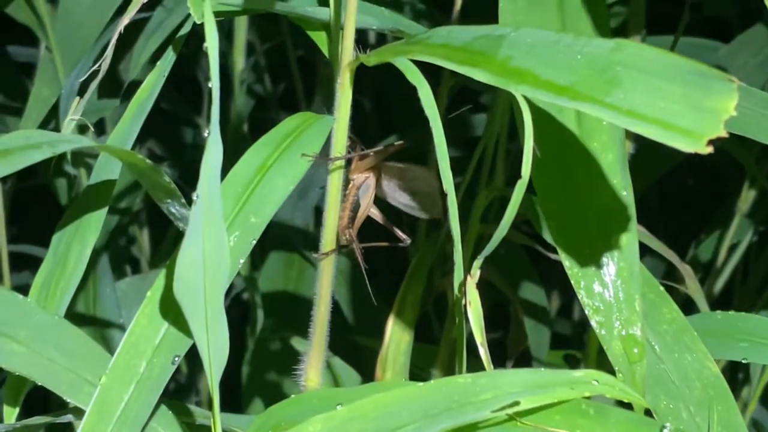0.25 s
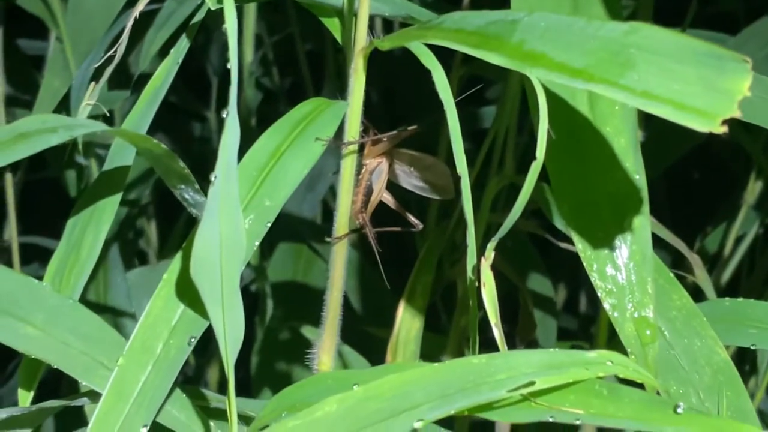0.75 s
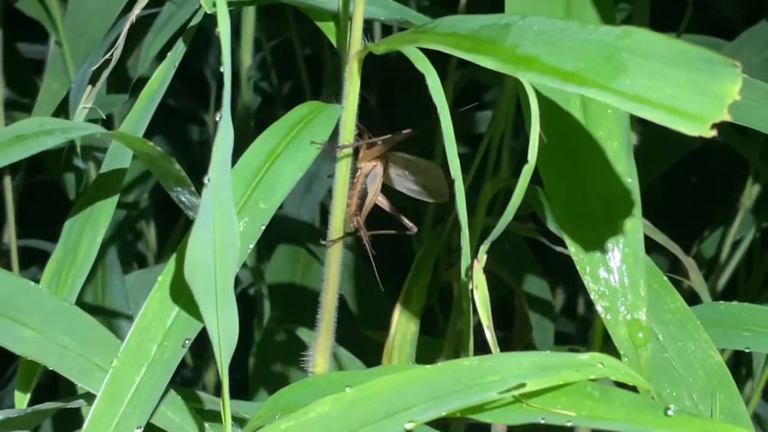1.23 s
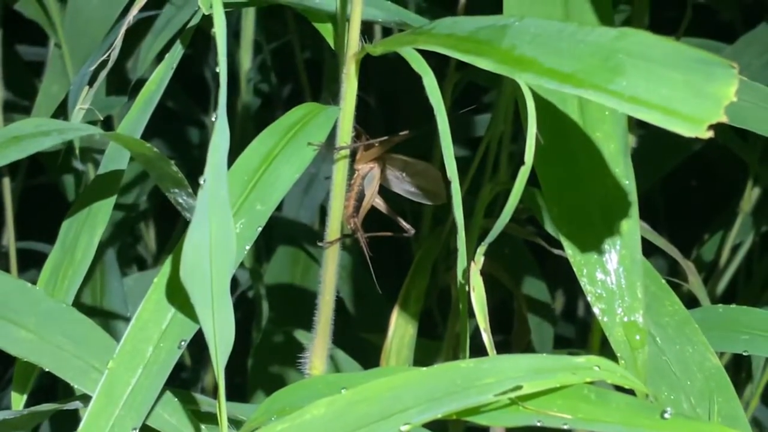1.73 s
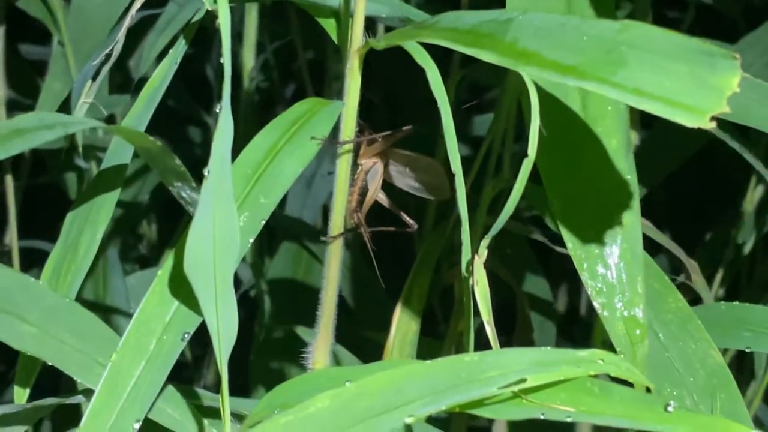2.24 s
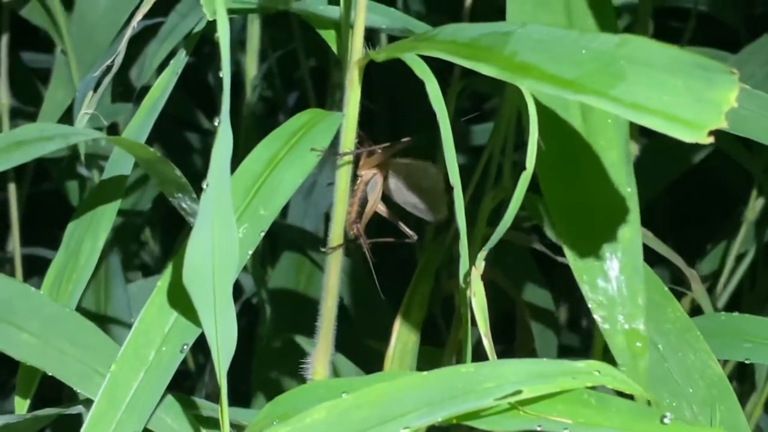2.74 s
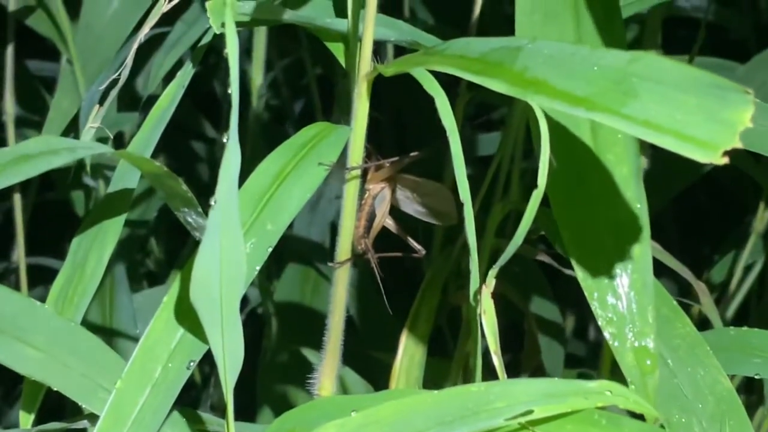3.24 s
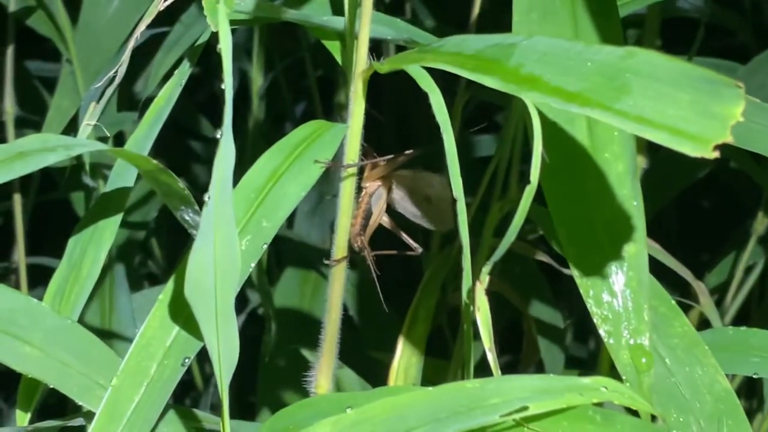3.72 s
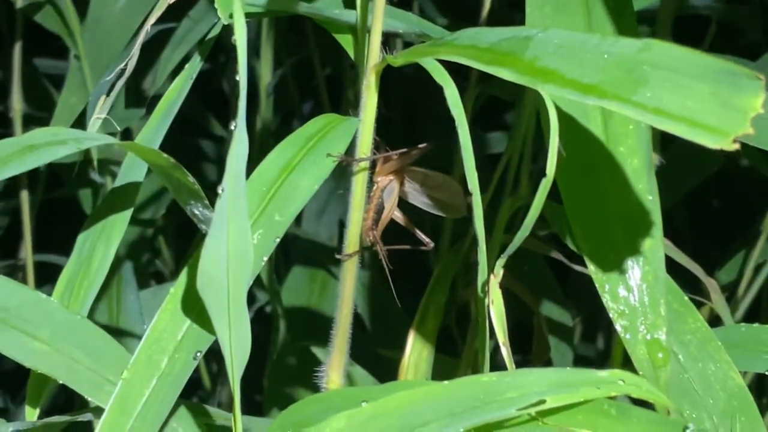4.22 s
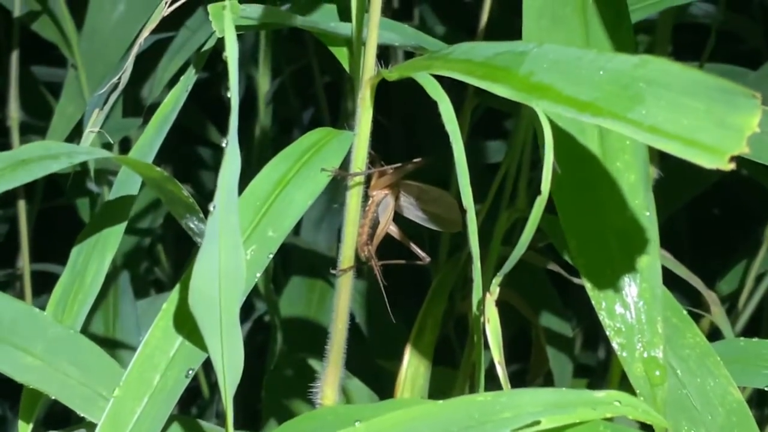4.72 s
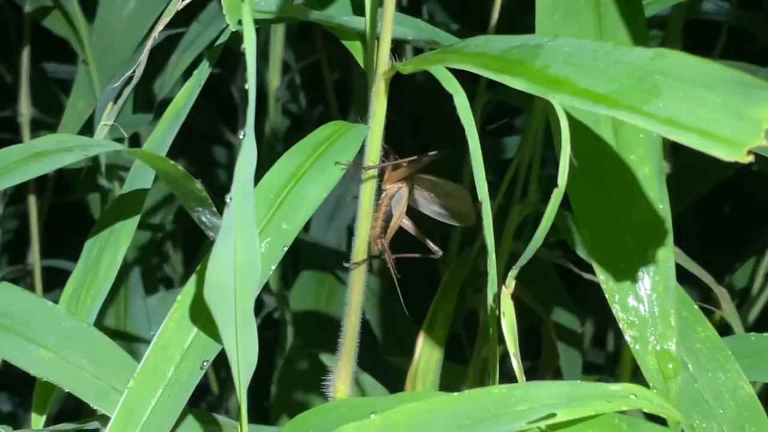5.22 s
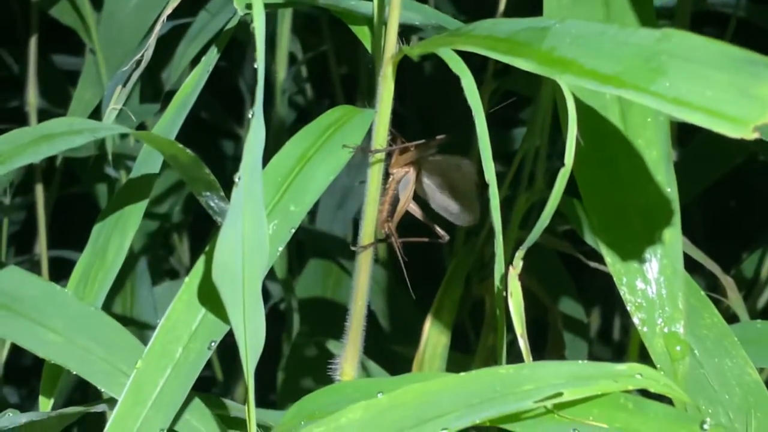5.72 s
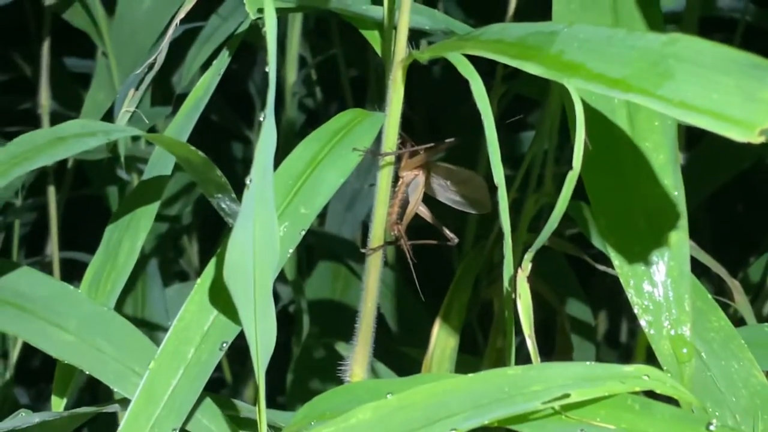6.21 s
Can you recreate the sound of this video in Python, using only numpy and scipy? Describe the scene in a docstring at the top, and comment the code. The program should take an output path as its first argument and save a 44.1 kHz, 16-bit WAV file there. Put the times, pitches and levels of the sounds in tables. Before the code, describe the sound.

A single cricket on a grass stem chirps loudly right at the microphone, outdoors at night. Each chirp is a quick run of four high, ringing pulses with a slight rasp, repeating a little more than once a second, with one longer pause past the middle. Far behind it, other crickets trill and thin buzzes come and go over a low hush, with a few faint bumps and leaf rustles.

```python
"""Close cricket at night

A cricket on a grass stem, right at the microphone, sings chirps of four wing strokes. Each stroke draws
the scraper over the file and rings the wings near 4.7 kHz, with a bright third harmonic. Other insects
trill far off over a low hush, with faint bumps and rustles; gain control ducks under the loud strokes."""
import sys
import numpy as np
from scipy import signal
from scipy.fft import rfft, irfft
from scipy.io import wavfile
from scipy.ndimage import uniform_filter1d, minimum_filter1d

SR = 44100
rng = np.random.default_rng(int(sys.argv[2]) if len(sys.argv) > 2 else 0)


def inscribe(sig):
    """Save sig as 16-bit PCM at rate SR to the path in sys.argv[1].

    A 1-D sig is mono; a 2-D sig holds one channel per row.
    Samples are clipped to [-1, 1] before scaling.
    """
    pcm = np.round(np.clip(np.atleast_2d(sig).T, -1, 1) * 32767)
    wavfile.write(sys.argv[1], SR, pcm.astype(np.int16))


N = 284886
TIME = np.arange(N) / SR

# tone of the night air: f/Hz, relative level/dB
AIR_SPECTRUM = [(20, -28), (35, -13), (55, 2.5), (90, 0.5), (170, -1.5), (300, -7.5), (550, -14),
                (1300, -11.5), (2700, -13), (4500, -14.5), (8000, -41), (13000, -17.5), (16000, -40.5)]
# stereo width of the air: f/Hz, side re mid/dB
AIR_WIDTH = [(40, -13), (150, -13.5), (550, -1), (1200, -1), (2500, -30), (5000, -16), (9000, 31),
             (13000, -12)]
# leaf rustles: t/s, level/dB
LEAF_TOUCHES = [(1.92, -58.5), (4.28, -63), (6.16, -57)]
# soft bumps: t/s, peak level/dB
BUMP_HITS = [(.19, -48), (.888, -41), (2.96, -47), (3.596, -45.5), (3.664, -44)]
# ring of a bump: f/Hz, relative level/dB, t60/s
BUMP_RING = [(183, -5.5, 0.042), (261, -5.5, 0.026), (480, -9.5, 0.018), (830, -14, 0.033)]
# far insects up to 7 kHz and a faint steady high hiss near 10 kHz: f/Hz, width/Hz, level/dB, flicker/dB
NOISE_BANDS = [(6880, 334, -53, 2.5), (7000, 150, -65, 3), (3308, 130, -68, 2.5), (5345, 1300, -67.5, -2.5),
               (9857, 700, -75, -0.5), (2318, 71, -76.5, 3)]
# far callers that repeat evenly: first call t/s, period/s, f/Hz, width/Hz, level/dB
SLOW_CALLERS = [(0.082, 0.285, 2324, 110.8, -74), (0.195, 1.09, 3055, 178.4, -74.5)]
# buzzes of a distant bush cricket: start t/s, end t/s, level/dB
BUZZ_SPANS = [(2.35, 2.7, -62.5), (3.74, 4.07, -58.5), (4.38, 4.9, -58.5), (5.3, 5.605, -61)]
# trills of distant crickets: start t/s, end t/s, f/Hz, level/dB, scattered re direct/dB
FAR_TRILLS = [(0, .47, 5940, -61, -7), (0.952, 1.965, 5790, -59, -0.5), (2.353, 3.32, 5930, -60, -9),
              (3.8, 4.5, 5770, -59.5, 1), (3.85, 4.847, 5195, -67, 5), (4.498, 4.85, 5840, -66, -1),
              (5.174, 6.1, 5940, -60.5, -9), (6.151, 6.46, 5730, -59, 2)]
# the near cricket's chirps: start t/s, stroke period/s, vigour (-1 to 1), flutter (0 to 1),
# number of clean strokes before the flutter sets in
CHIRP_CUES = [(0.042, .0670, -1, .03, 1), (0.998, .0677, -.2, .03, 1), (1.968, .0680, 0, .43, 3),
              (2.743, .0680, .2, .24, 2), (3.520, .0684, .2, .03, 1), (4.833, .0670, -.9, .27, 2),
              (5.553, .0684, 1, .26, 1), (6.281, .0684, .9, .02, 1)]
# the four closing strokes of a chirp: length/s, f/Hz, level/dB, rise per vigour/Hz, gain per vigour/dB
CLOSING_STROKES = [(.053, 4556, -22.5, 8.6, .4), (.055, 4670, -18.5, 48, 1.2), (.057, 4748, -14.5, 15, 1.2),
                   (.061, 4760, -15.4, 1.6, 0.45)]
# shape of the light first stroke: position (0 to 1), relative level/dB, pitch offset/Hz
LIGHT_STROKE = [(0, -16, 50), (.07, -3, 30), (.3, -.3, -10), (.6, 1.2, 5), (.82, .5, 40), (.92, -2, 20),
                (1, -15, -150)]
# shape of the three firm strokes: position (0 to 1), relative level/dB, pitch offset/Hz
FIRM_STROKE = [(0, -17, -40), (.1, -3, -50), (.26, 1.2, -20), (.43, 3.4, -2), (.68, 1.5, 10), (.8, -.9, -4),
               (.92, -5.5, -90), (1, -17.5, -260)]
# higher wing modes that wake when the wings slip: f/Hz, relative level/dB
WING_SLIP_MODES = [(5228, -16), (5582, -25)]
# the wings' upper resonance, which shapes the third harmonic: f/Hz, gain/dB
UPPER_RESONANCE = [(13400, -14), (13620, -10), (13705, -21), (13790, -14), (13850, -8), (13980, .5),
                   (14100, -1.5), (14170, -6), (14260, -9.5), (14340, -12.5)]
# tone of the file's scraping noise: f/Hz, gain/dB
RASP_SPECTRUM = [(2200, -77.5), (3200, -25.5), (3700, -12.5), (4200, -1.5), (4700, 2), (6000, -9.5),
                 (8300, -21.5), (10500, -11), (13000, 4.5), (14200, -1), (15700, -10.5)]
# hard snags of the scraper at the start of some strokes: t/s, relative level/dB
SCRAPER_SNAGS = [(0.175, -27), (2.035, -30), (2.877, -35), (2.948, -26.5), (3.588, -28.5), (3.655, -29),
                 (5.621, -35), (5.688, -38), (6.347, -33.5)]


def undb(db):
    """Decibels to gain."""
    return 10 ** (np.asarray(db) / 20)


def unit(x):
    """Scale to rms 1."""
    return x / np.sqrt(np.mean(np.abs(x) ** 2))


def colour(x, points):
    """EQ by a curve of (f/Hz, gain/dB) points."""
    hz, db = np.transpose(points)
    bins = np.maximum(np.fft.rfftfreq(N, 1 / SR), 1)
    return irfft(rfft(x) * undb(np.interp(np.log(bins), np.log(hz), db)), N)


def band(hz, width_hz):
    """A band of noise around one pitch."""
    detune = (np.fft.rfftfreq(N, 1 / SR) - hz) / width_hz
    return unit(irfft(rfft(rng.standard_normal(N)) / (1 + detune ** 2) ** 2, N))


def walk(rate_hz):
    """Smooth random modulation with a spread near 1."""
    hold = int(SR / rate_hz)
    steps = np.repeat(rng.standard_normal(N // hold + 1), hold)
    return 1.7 * uniform_filter1d(uniform_filter1d(steps, hold), hold)[:N]


def wobble(n, size):
    """Random modulation for one stroke, smoothed over `size` samples."""
    return unit(np.convolve(rng.standard_normal(SR // 8), np.hanning(size), "same"))[:n]


def ports(tone, lead_rad):
    """Place a complex tone in stereo by its phase lead at the left microphone port."""
    return np.sqrt(2) * np.real(tone * np.exp(.5j * lead_rad * np.array([[1], [-1]])))


def spread(mid, side):
    """Mid and side to left and right."""
    return mid + side * np.array([[1], [-1]])


def add(out, start_s, x):
    """Mix x into out from a given time."""
    i = max(int(start_s * SR), 0)
    n = max(min(x.shape[-1], N - i), 0)
    out[..., i:i + n] += x[..., :n]


def night_air(db=-61, waver_db=.51):
    """The bed: a low hush that wavers slightly."""
    mid, side = (unit(colour(rng.standard_normal(N), AIR_SPECTRUM)) for _ in range(2))
    return undb(db + waver_db * walk(5.2)) * spread(mid, colour(side, AIR_WIDTH))


def rustles(width_s=.008, hz=1500, width_hz=1600):
    """A leaf brushes its neighbour now and then: a soft puff of noise."""
    touch = sum(undb(db) * np.exp(-.5 * ((TIME - s) / width_s) ** 2) for s, db in LEAF_TOUCHES)
    return touch * band(hz, width_hz)


def bumps():
    """Faint dull knocks close to the microphone."""
    out, t = np.zeros(N), np.arange(SR // 10) / SR
    ring = sum(undb(db - 60 * t / t60) * np.sin(2 * np.pi * hz * t) for hz, db, t60 in BUMP_RING)
    for s, db in BUMP_HITS:
        add(out, s, undb(db) * ring / np.abs(ring).max())
    return out


def far_insects_and_hiss():
    """Far insects blurred into noise bands, a faint steady high hiss near 10 kHz, two slow callers."""
    out = np.zeros((2, N))
    for hz, width_hz, db, flicker_db in NOISE_BANDS:
        layer = ports(unit(signal.hilbert(band(hz, width_hz))), -.81)
        layer += spread(0, .18 * band(hz, width_hz))
        out += undb(db + flicker_db * (walk(40) + walk(5.023)) / 2) * layer
    for first_s, period_s, hz, width_hz, db in SLOW_CALLERS:
        calls = np.cos(np.pi * (TIME - first_s) / period_s) ** 4
        out += undb(db) * unit(calls) * spread(band(hz, width_hz), .083 * band(hz, width_hz))
    return out


def bush_cricket(hz=10130, width_hz=450):
    """Thin buzzes that swell and fade, far off to one side."""
    swell = sum(undb(db) * np.sin(np.pi * np.clip((TIME - start) / (end - start), 0, 1))
                for start, end, db in BUZZ_SPANS)
    return swell * ports(unit(signal.hilbert(band(hz, width_hz))), 2.06)


def far_trills(stroke_hz=37.64, overtone_db=-24, fade_s=.024, blur_hz=240):
    """Distant crickets trill in turns; scattering blurs the strokes of the furthest."""
    out, waver_db, drift = np.zeros((2, N)), walk(8), walk(30)
    # a noise band shifted down to 0 Hz, ready to ride on each trill's pitch
    blur = unit(signal.hilbert(band(SR / 4, blur_hz))) * np.exp(-.5j * np.pi * np.arange(N))
    for start, end, hz, db, scattered_db in FAR_TRILLS:
        span = (TIME >= start) & (TIME < end)
        t = TIME[span] - start
        gate = np.clip(np.minimum(t, t[-1] - t) / fade_s, 0, 1)
        cycle = 2 * np.pi * stroke_hz * t
        phase = 2 * np.pi * np.cumsum(hz + 35 * np.sin(cycle) + 10 * drift[span]) / SR
        direct = unit(1 - .8 * np.cos(cycle)) * np.exp(1j * phase)
        scattered = undb(scattered_db) * blur[span] * np.exp(2j * np.pi * hz * t)
        overtone = undb(overtone_db) * ports(direct * np.exp(1j * phase), 0)
        voice = ports(unit(direct + scattered), -1.3) + overtone
        add(out, start, undb(db + waver_db[span]) * gate * voice)
    return out


def foliage(x, width=.37, early_t60_s=.13, early_db=-24.5, late_t60_s=.6, late_db=-37):
    """Near leaves scatter a quick echo, the plants further off a faint tail."""
    t = np.arange(SR // 2) / SR
    response = 0
    for t60_s, db in ((early_t60_s, early_db), (late_t60_s, late_db)):
        mid, side = rng.standard_normal((2, len(t))) * undb(-60 * t / t60_s) * (t > .003)
        response = response + undb(db) * spread(mid, width * side) / np.sqrt(np.sum(mid ** 2))
    dull = signal.sosfilt(signal.butter(1, 8000, fs=SR, output="sos"), x)
    return signal.fftconvolve(dull, response, axes=1)[:, :N]


def wing_opening(hz=13500, swing_hz=1100, warble_hz=210, db=-29):
    """The wings flick open: the scraper skids back over the file with a tiny warbling squeak."""
    t = np.arange(int(.012 * SR)) / SR
    warble = np.sin(2 * np.pi * (warble_hz * t + rng.random()))
    pitch = hz + swing_hz * warble + 300 * wobble(len(t), size=30)
    return undb(db) * np.hanning(len(t)) * ports(np.exp(2j * np.pi * np.cumsum(pitch) / SR), 0)


def scraper_tick(hz=3750, t60_s=.0058, db=-42):
    """The scraper lands on the file at the head of a chirp and knocks a low wing mode."""
    t = np.arange(SR // 20) / SR
    attack = 1 - np.exp(-t * hz / 2)
    return undb(db - 60 * t / t60_s) * attack * ports(np.exp(2j * np.pi * hz * t), .68)


def catch(rise_s=.0027):
    """Envelope of the short rasp as the first teeth strike, before the wings ring steadily."""
    t = np.arange(SR // 20) / SR
    return t / rise_s * np.exp(1 - t / rise_s)


def file_rasp(envelope, grit_db=3, grit_hz=900):
    """Scraping noise of the file; uneven teeth make it gritty."""
    gritty = envelope * unit(undb(grit_db * walk(grit_hz)))
    mid, side = (colour(gritty * rng.standard_normal(N), RASP_SPECTRUM) for _ in range(2))
    return 2 * spread(mid, .35 * side)


def wing_stroke(shape, length_s, hz, flutter, flutter_hz,
                second_db=-24, third_db=-2.5, easing_db=-3, jitter_hz=6, shimmer=.08):
    """One closing stroke: the file's teeth drive the wings, and the pitch sags as the wings slow down."""
    n = int(length_s * SR)
    t, position = np.arange(n) / SR, np.linspace(0, 1, n)
    knots, db, offset_hz = np.transpose(shape)
    slow, grain, stray = wobble(n, size=400), wobble(n, size=80), wobble(n, size=600)
    pitch = hz + np.interp(position, knots, offset_hz)
    phase = 2 * np.pi * np.cumsum(pitch + jitter_hz * grain) / SR
    swell = undb(np.interp(position, knots, db)) * signal.windows.tukey(n, .05)
    # in mid-stroke the two wings can fall out of step and beat against each other
    slip = flutter * np.sin(np.pi * position) ** 2
    beat_cycles = np.cumsum(flutter_hz * (1 + .12 * stray)) / SR + rng.random()
    beat = slip * np.exp(2j * np.pi * beat_cycles)
    roughness = (.1 * slip + .011) * grain
    first = unit(swell * (1 + 1.1 * beat / (1 + .5 * beat) + roughness)) * np.exp(1j * phase)
    for mode_hz, mode_db in WING_SLIP_MODES:
        first += slip * undb(mode_db) * np.exp(2j * np.pi * mode_hz * t)
    second = unit(swell) * np.exp(2j * phase)
    # the third harmonic flares as it glides through the upper resonance, and fades as the grip eases
    flare = undb(np.interp(3 * pitch, *np.transpose(UPPER_RESONANCE)))
    fades = np.clip(np.minimum(position / .05, (1 - position) / .2), 0, 1)
    grip = np.sqrt(swell) * undb(easing_db * position) * fades
    third = flare * unit(grip * (1 + .5 * beat + shimmer * (slow + grain))) * np.exp(3j * phase)
    return ports(first, .68) + undb(second_db) * ports(second, 2.6) + undb(third_db) * ports(third, 0)


def cricket(catch_db=-40, scrape_db=-32, light_scrape_db=-47, brush_db=-55, brush_s=.033,
            opening_lead_s=.019, clean_flutter=.03, flutter_hz=163.6, flutter_spread_oct=.22):
    """The lead voice: the wings flick open, then close four times, each time catching with a rasp."""
    song, rasp_envelope = np.zeros((2, N)), np.zeros(N)
    for start_s, period_s, vigour, flutter, clean_strokes in CHIRP_CUES:
        add(song, start_s - opening_lead_s, wing_opening())
        add(song, start_s, scraper_tick())
        for k, (length_s, hz, db, vigour_hz, vigour_db) in enumerate(CLOSING_STROKES):
            onset_s, level_db = start_s + k * period_s, db + vigour * vigour_db
            shape = FIRM_STROKE if k else LIGHT_STROKE
            slip = clean_flutter if k < clean_strokes else flutter
            beat_hz = flutter_hz * 2 ** (flutter_spread_oct * rng.standard_normal())
            tone = wing_stroke(shape, length_s, hz + vigour * vigour_hz, slip, beat_hz)
            add(song, onset_s, undb(level_db) * tone)
            n = int(length_s * SR)
            add(rasp_envelope, onset_s, undb(catch_db) * catch())
            add(rasp_envelope, onset_s, undb(level_db + scrape_db) * np.linspace(1, 0, n))
            if k == 0:  # the light stroke grips less and scrapes all along
                add(rasp_envelope, onset_s, undb(light_scrape_db) * np.ones(n))
            # the scraper brushes the file just before it catches
            add(rasp_envelope, onset_s - brush_s, undb(brush_db) * np.hanning(int(brush_s * SR)))
    for onset_s, db in SCRAPER_SNAGS:
        add(rasp_envelope, onset_s, undb(db) * catch(rise_s=.002))
    return song + file_rasp(rasp_envelope)


def scene():
    """The mix: the near cricket in its foliage, and the night around it."""
    near = cricket()
    echo = foliage(near)
    backdrop = far_trills() + far_insects_and_hiss() + bush_cricket() + night_air()
    return near + echo + backdrop + bumps() + rustles()


def record(dry, threshold_db=-9.4, ratio=4, hold_s=.1, lag_s=.012, slew_s=.008, top_hz=15750):
    """Gain control ducks a moment after loud peaks and holds briefly; a steep low-pass cuts the top."""
    hold = int(hold_s * SR) | 1
    peak = -minimum_filter1d(-np.abs(dry).max(axis=0), hold, origin=hold // 2)
    cut_db = (1 - 1 / ratio) * np.minimum(threshold_db - 20 * np.log10(peak + 1e-9), 0)
    late_cut_db = np.pad(cut_db, (int(lag_s * SR), 0))[:N]
    pole = np.exp(-1 / (slew_s * SR))
    gain = undb(signal.lfilter([1 - pole], [1, -pole], late_cut_db))
    return signal.sosfilt(signal.ellip(10, .2, 90, top_hz, fs=SR, output="sos"), dry * gain)


dry = scene()
out = record(dry)
inscribe(out)
```